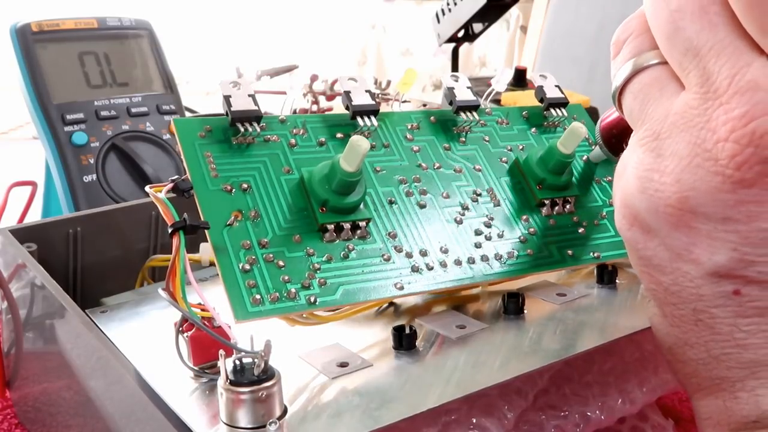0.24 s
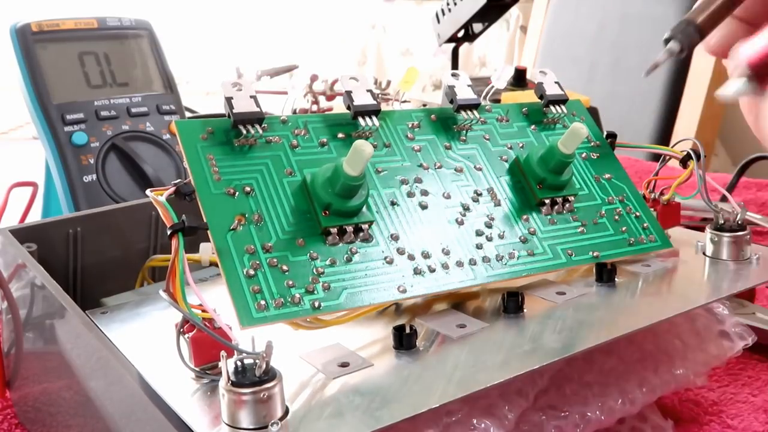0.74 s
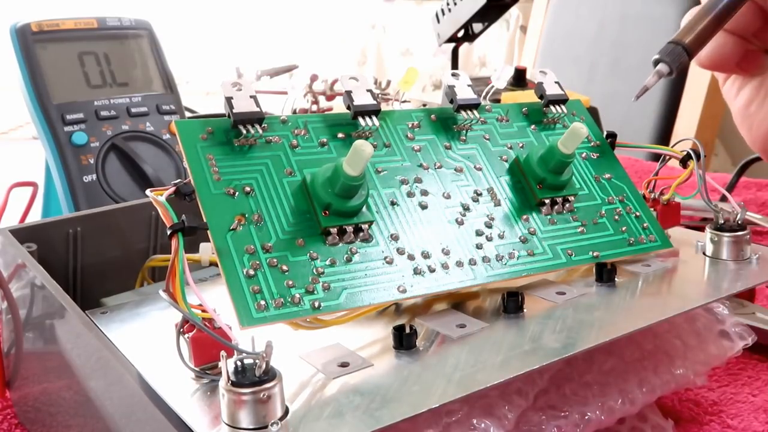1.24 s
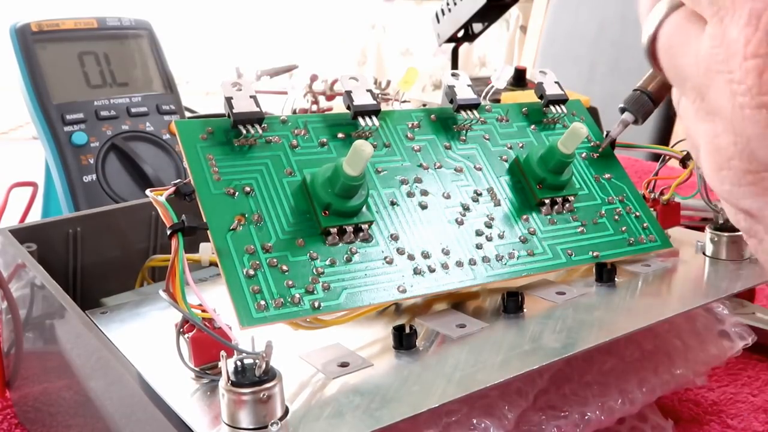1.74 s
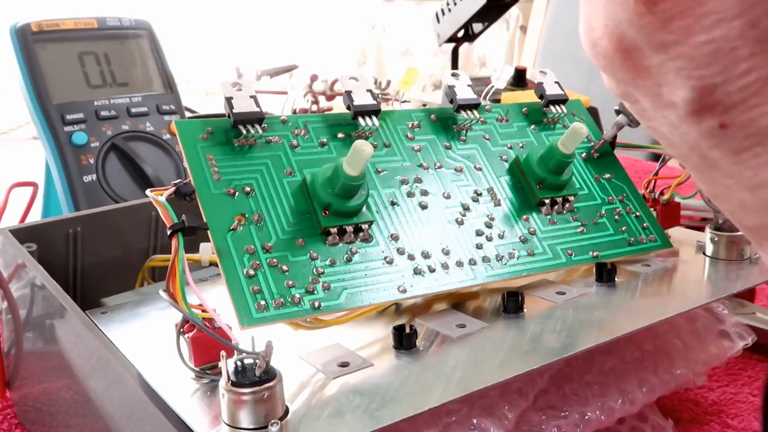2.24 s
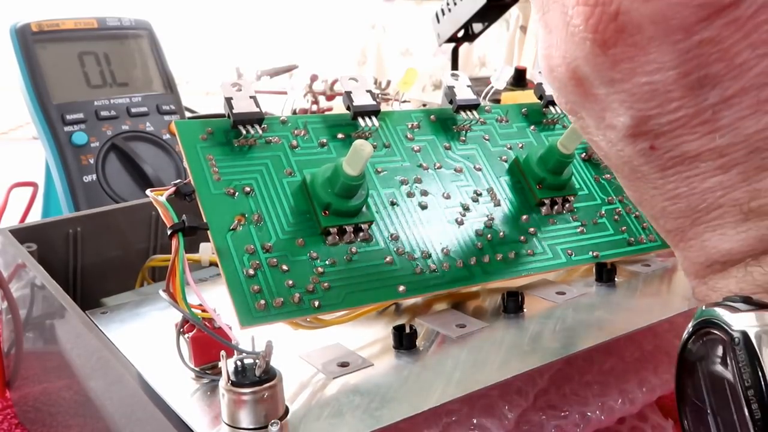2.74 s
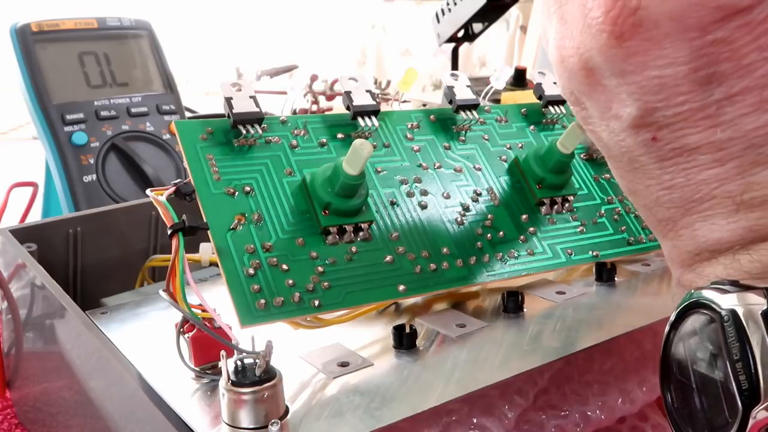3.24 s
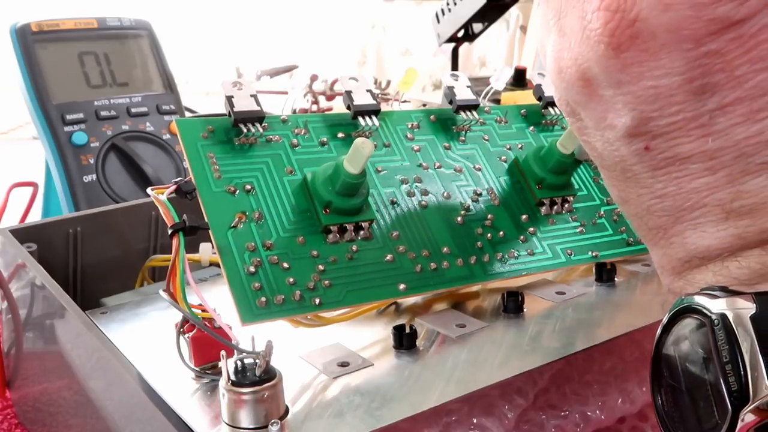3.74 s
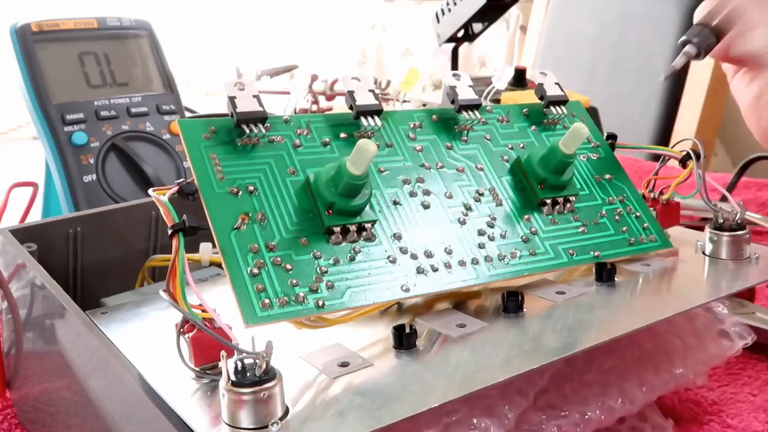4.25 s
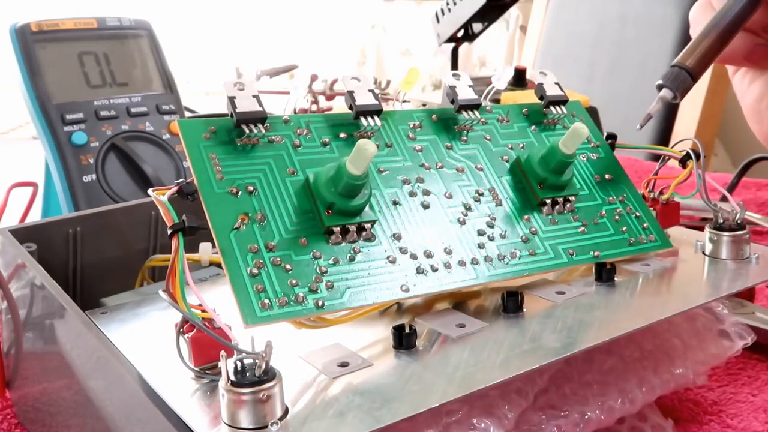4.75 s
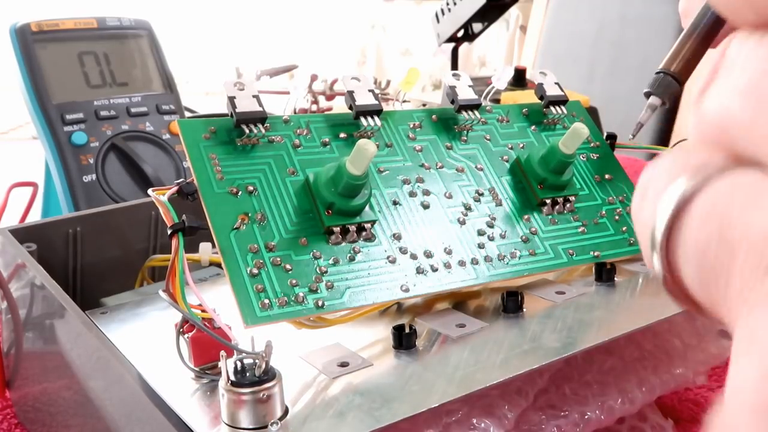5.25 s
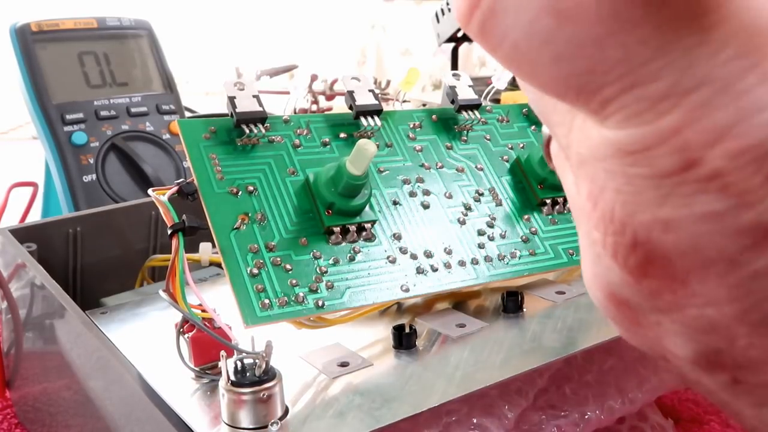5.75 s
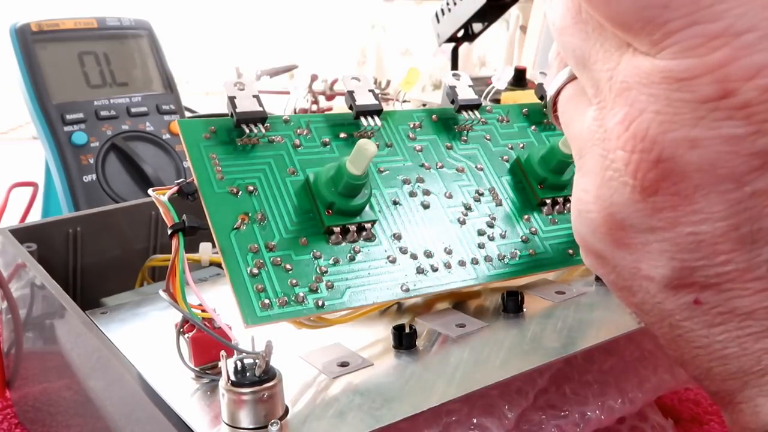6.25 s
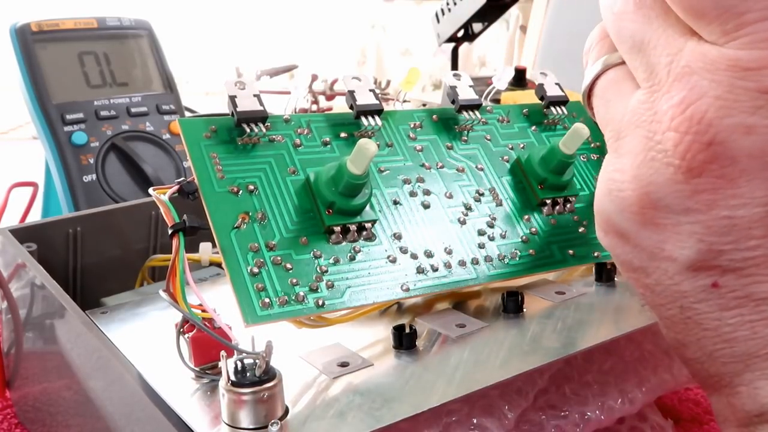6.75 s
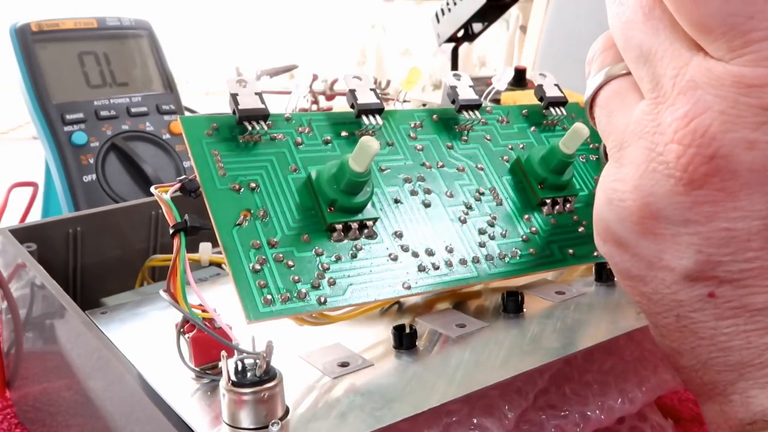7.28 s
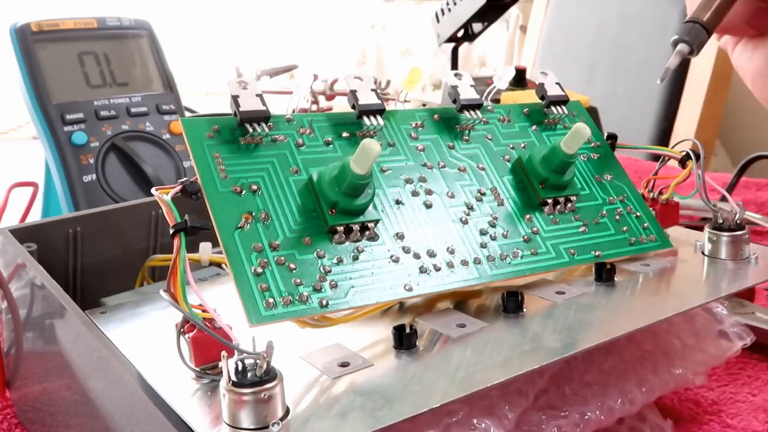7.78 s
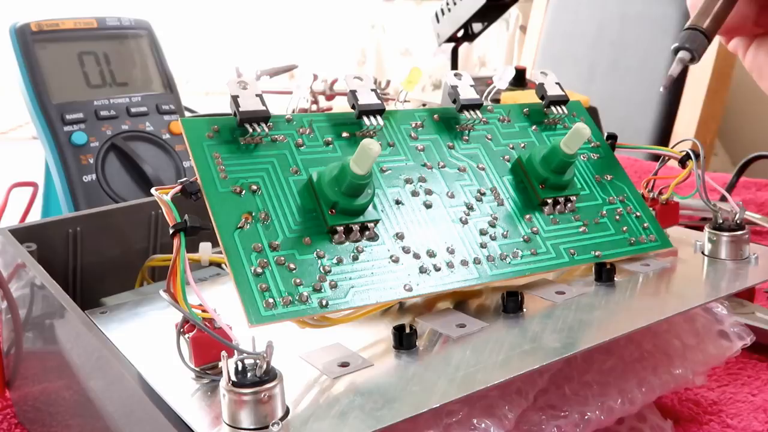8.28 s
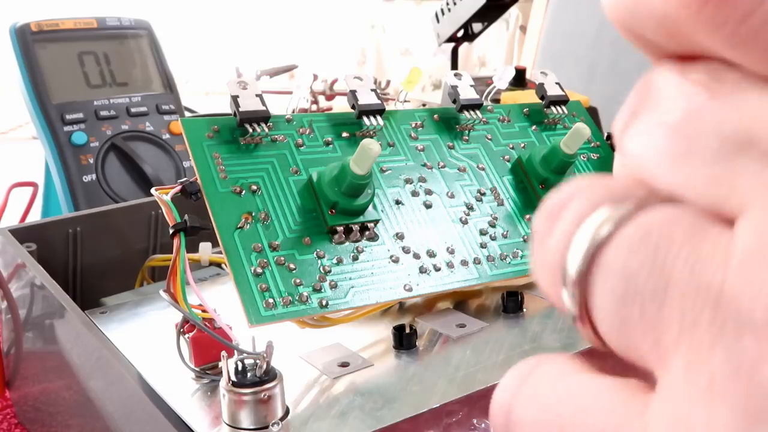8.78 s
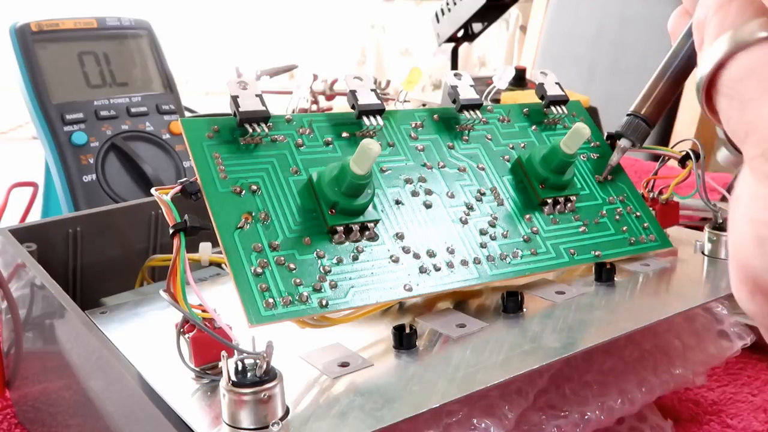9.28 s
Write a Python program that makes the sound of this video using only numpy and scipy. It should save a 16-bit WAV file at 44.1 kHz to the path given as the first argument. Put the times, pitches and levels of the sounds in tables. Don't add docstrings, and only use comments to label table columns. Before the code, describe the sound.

Three pairs of loud snaps in a small, quiet room: a desoldering pump discharges with a tiny rush of air and a bright crack, then is cocked by hand with a short scrape, a metallic catch and a lighter return click. Small ticks, gentle knocks on board and bench and cloth rustle fill the gaps. Close stereo pickup; the low background hiss dips after each snap and recovers.

```python
import sys
import numpy as np
from scipy import signal
from scipy.fft import rfft, irfft, next_fast_len
from scipy.io import wavfile
from scipy.ndimage import uniform_filter1d

SR = 44100
rng = np.random.default_rng(int(sys.argv[2]) if len(sys.argv) > 2 else 0)


def gain_from_decibels(decibels):
    exponent = np.asarray(decibels, float) / 20
    return 10 ** exponent


def wrap_up_sound(samples):
    columns = np.atleast_2d(samples).T
    tamed = np.clip(columns, -1, 1)
    steps = np.round(tamed * 32767).astype(np.int16)
    wavfile.write(sys.argv[1], SR, steps)


N = 419832
T = np.arange(2 ** 14) / SR

# f/Hz, spread/Hz, level/dB, t60/s
BOARD = [(340, 100, -5.5, 0.09), (600, 370, -1.5, 0.24), (1103, 170, -1.5, 0.3), (1380, 250, -3.5, 0.17)]


def evened(x):
    return x / np.sqrt(np.mean(x ** 2) + 1e-20)


def read(points, hz):
    f, value = np.transpose(points)
    return np.interp(np.log(hz + 1), np.log(f + 1), value)


def add(mix, s, sound):
    part = mix[round(s * SR):][:len(sound)]
    part += sound[:len(part)]


def coloured(points, size):
    spectrum = rfft(rng.standard_normal(size))
    spectrum *= gain_from_decibels(read(points, np.fft.rfftfreq(size, 1 / SR)))
    return evened(irfft(spectrum, size))


def fade(t60, rise_s):
    return (1 - np.exp(-T / rise_s)) * gain_from_decibels(-60 * T / t60)


def burst(hold_s, t60, delay_s=0):
    t = T - delay_s
    return np.clip(t * 4000, 0, 1) * gain_from_decibels(-60 * np.maximum(t - hold_s, 0) / t60)


def ring(crowds, factor=1):
    hz, spread_hz, db, t60 = np.transpose(crowds)[:, :, None]
    bins = np.fft.rfftfreq(len(T), 1 / SR)
    off_centre = 2 * (bins - hz * factor) / spread_hz
    shape = 1 / (1 + off_centre ** 2) ** 1.2 / np.sqrt(spread_hz)
    bands = irfft(shape * np.exp(2j * np.pi * rng.random(shape.shape)), len(T))
    decay = gain_from_decibels(db - 60 * T / t60 - 130 * T ** 2)
    sound = (decay * bands).sum(0) * (1 - np.exp(-T / 0.0013))
    return sound / np.sqrt(np.mean(sound[:SR // 50] ** 2))


def thud(hz, t60):
    sinking = 0.6 + 0.31 * np.exp(-T / 0.016)
    push = np.sin(2 * np.pi * hz * T * sinking) * gain_from_decibels(-60 * T / t60)
    return signal.lfilter(*signal.butter(1, 70, "high", fs=SR), push)


def rub(s, length_s, db, shape, colour):
    rise, from_db, slacken, slack_db, last, last_db = shape
    t = np.arange(0, length_s, 1 / SR)
    stroke_db = np.interp(t / length_s, [0, rise, slacken, last], [from_db, 0, slack_db, last_db])
    rough_db = 2.1 * evened(uniform_filter1d(rng.standard_normal(len(t)), 150))
    hiss = coloured(colour, len(t)) * signal.windows.tukey(len(t), 0.15)
    return s, gain_from_decibels(db + stroke_db + rough_db) * hiss


def background():
    # f/Hz, level/dB per Hz
    hiss = [(12, -42), (20, -14.5), (32, -8.5), (66, -9), (220, -7.5), (334, -6.5), (536, -12.5),
            (1110, -15.5), (1380, -17), (2480, -19.5), (9000, -33), (13200, -39.5), (15600, -57)]
    # f/Hz, width/Hz, level/dB
    hum = [(60, 19, -65.5), (87.6, 28, -66.5), (163, 12, -70.5), (331, 24, -69), (13000, 60, -90.5)]
    # f/Hz, likeness/1
    likeness = [(60, 1), (240, 0.35), (950, -0.02), (3770, 0.16), (15000, 0.00017)]
    hiss_db = -54.5
    frames, hz = N // 512 + 5, np.fft.rfftfreq(2048, 1 / SR)
    a, b, c, d, patches = rng.standard_normal((frames, 1025, 5)).T
    patches = evened(uniform_filter1d(uniform_filter1d(patches, 8, 0), 10, 1))
    same = np.clip(read(likeness, hz), -1, 1)[:, None]
    left = a + 1j * b
    right = same * left + np.sqrt(1 - same ** 2) * (c + 1j * d)
    z = np.array([left, right]) * gain_from_decibels(read(hiss, hz)[:, None] + 2.0 * patches)
    out = gain_from_decibels(hiss_db) * evened(signal.istft(z, nperseg=2048, noverlap=1536)[1][:, :N])
    for f, width, db in hum:
        r = np.exp(-np.pi * width / SR)
        wander = rng.standard_normal(N) + 1j * rng.standard_normal(N)
        drift = signal.lfilter([1], [1, -2 * r, r * r], wander)
        out += gain_from_decibels(db) * evened((drift * np.exp(2j * np.pi * f * np.arange(N) / SR)).real)
    return out


def knock(s, db, hz):
    board_db, click_db = 1.1, 0.84
    colour = [(0.2 * hz, -8), (hz, 0), (3 * hz, -14), (8 * hz, -31), (30 * hz, -62)]
    click = coloured(colour, len(T)) * (fade(0.059, 0.0004) + 0.21 * fade(0.24, 0.002))
    note = ring([(hz, 0.27 * hz, 0, 0.065)])
    board = ring(BOARD) * fade(0.19, 0.00082) * min(hz / 800, 1) ** 2
    return s, gain_from_decibels(db) * 0.39 * (note + gain_from_decibels(board_db) * board + gain_from_decibels(click_db) * click)


def ping(s, db, hz, note_db, treble_db):
    return tick(s, db, hz, note_db, treble_db, tail_db=-20.5)


def fire(s, db, thud_db, treble_db):
    # f/Hz, level/dB
    slam_colour = [(150, -26.5), (600, -7.5), (1600, -13.5), (2250, -5.5), (3440, -13), (5110, -2.5),
                   (6100, -12), (7180, -7), (10700, -9), (14000, -3), (15600, -24.5)]
    # f/Hz, level/dB
    rush_colour = [(88, -30), (150, -6), (1640, -11), (2470, -3), (3500, -3), (4960, -1), (8230, -4),
                   (13900, -7), (15600, -16.5)]
    # f/Hz, spread/Hz, level/dB, t60/s
    barrel = [(153.7, 9.5, -6.5, .42), (400, 300, -5.5, 0.24), (580, 390, -6.5, 0.12),
              (813, 90, -13.5, 0.32), (1090, 200, -7.5, 0.14), (2040, 900, -5.5, .2),
              (2670, 2000, -5, 0.23), (3828, 500, -3, .12), (5170, 1500, 0.5, 0.26),
              (7500, 1200, -7.5, 0.22), (11800, 3500, -5, 0.26)]
    travel_s, rush_db, rebound_db = 0.0145, -13.5, -24.5
    chatter = gain_from_decibels(3.1 * evened(uniform_filter1d(rng.standard_normal(len(T)), 40)))
    rush = coloured(rush_colour, len(T)) * chatter * fade(1.0, 0.0046)
    rush *= gain_from_decibels(-60 * np.maximum(T - travel_s, 0) / 0.13)
    crack = [(hz, level + treble_db * np.log2(1 + hz / 8000)) for hz, level in slam_colour]
    hit_and_rattle = burst(0.0025, 0.01) + 0.16 * burst(0.00093, 0.025, 0.008)
    slam = 0.72 * coloured(crack, len(T)) * hit_and_rattle
    slam += gain_from_decibels(thud_db) * thud(350, 0.014) + gain_from_decibels(-21) * thud(180, 0.028)
    slam += gain_from_decibels(-20.0) * ring(barrel)
    sound = gain_from_decibels(rush_db) * (rush + 0.14 * thud(330, 0.062))
    add(sound, travel_s, slam)
    add(sound, travel_s + 0.037, gain_from_decibels(rebound_db) * ring(BOARD) * fade(0.9, 0.0071))
    return s - travel_s, gain_from_decibels(db) * sound


def tick(s, db, hz, note_db=-18, treble_db=-1.5, tail_db=-16):
    colour = [(300, -26), (2200, -5.5), (6000, 1.0), (11000, treble_db - 7.5), (16000, 2 * treble_db - 22)]
    crack = coloured(colour, len(T)) * (burst(0.0012, 0.019) + gain_from_decibels(tail_db) * fade(0.24, 0.0014))
    note = ring([(hz, 0.2 * hz, 0, 0.024)])
    return s, gain_from_decibels(db) * 0.8 * (gain_from_decibels(note_db) * note + crack)


def slide(s, length_s, db):
    # rising share/1, start level/dB, slackening share/1, slack level/dB, last share/1, last level/dB
    stroke = (-1.16, -10, -2.04, -5.5, 1.6, -0.6)
    # f/Hz, level/dB
    colour = [(180, -31), (300, 3), (589, -7), (955, -3), (1470, -10.5), (1970, -7), (6470, -4.5),
              (11900, -10.5), (14500, -23)]
    return rub(s, length_s, db, stroke, colour)


def rustle(s, length_s, db):
    # rising share/1, start level/dB, slackening share/1, slack level/dB, last share/1, last level/dB
    stroke = (-0.75, -7, 0.16, -5, -0.4, -7.5)
    # f/Hz, level/dB
    colour = [(60, -12), (150, -2), (330, 3.5), (700, -7), (1200, -11), (2500, -14), (6000, -35)]
    return rub(s, length_s, db - 5.0, stroke, colour)


def latch(s, db, second_db, spring_hz, jolt_db):
    # f/Hz, level/dB
    click_colour = [(59, -51), (100, -20.5), (1110, -16.5), (1750, -14.5), (2330, -14), (3070, -1.5),
                    (4220, -15.5), (5670, -5.5), (6850, -8.5), (7620, 0.5), (8830, -15), (10500, -10),
                    (15600, -23)]
    # f/Hz, spread/Hz, level/dB, t60/s
    spring = [(3000, 400, 9, 0.21), (3600, 400, -10, .14), (4748, 200, -14, .2), (5700, 900, -12.5, .12),
              (7510, 500, -7, .16), (1100, 1800, -14, .1)]
    click = burst(0.0015, 0.0051) + gain_from_decibels(second_db) * burst(0.0014, 0.02, 0.008)
    click += gain_from_decibels(-26.0) * fade(0.2, 0.002)
    stretch = spring_hz / spring[0][0]
    crack = [(hz * stretch, level) for hz, level in click_colour]
    body = gain_from_decibels(-27.5) * ring(spring, stretch) + gain_from_decibels(jolt_db) * thud(140, 0.07)
    body += gain_from_decibels(-23) * ring([(1.053 * spring_hz, 800, 0, 0.016)])
    return s, gain_from_decibels(db) * (0.61 * coloured(crack, len(T)) * click + body)


def spring_back(s, db, body_db, thud_db):
    # f/Hz, level/dB
    click_colour = [(180, -21.5), (300, -4.5), (1240, -5), (1650, -11), (2750, -5), (3650, -2.5),
                    (6190, -10.5), (7430, -1.5), (12200, -24), (13500, -19.5), (15600, -29)]
    # f/Hz, spread/Hz, level/dB, t60/s
    body = [(130, 79, -5, 0.2), (605, 290, 0, 0.1031), (1190, 490, -6, 0.18), (3590, 1100, 4, 0.118),
            (5220, 310, -9.5, 0.1), (7600, 700, -8.5, 0.08)]
    rod_hz, rod_t60_s, rod_db = 4800, 0.22, -26
    click = 0.7 * coloured(click_colour, len(T)) * (burst(0.0012, 0.0077) + gain_from_decibels(-26.5) * fade(0.22, 0.002))
    rod = np.sin(2 * np.pi * rod_hz * T) * fade(rod_t60_s, 0.0022)
    rings = gain_from_decibels(body_db) * ring(body) + gain_from_decibels(rod_db) * rod
    return s, gain_from_decibels(db) * (click + gain_from_decibels(thud_db) * thud(306, 0.017) + rings)


def room(x):
    # f/Hz, t60/s
    room_t60 = [(150, 0.5), (600, 0.37), (2000, 0.4), (6000, 0.32), (14000, 0.11)]
    taps = np.zeros((2, SR // 2))
    at = np.arange(200, SR // 2 - 20, 20) + rng.integers(0, 20, (2, (SR // 2 - 201) // 20))
    np.put_along_axis(taps, at, rng.choice([-1., 1.], at.shape), 1)
    hz, t, z = signal.stft(taps + 0.23 * taps[::-1], SR, nperseg=256)
    decay = gain_from_decibels(-60 * t / read(room_t60, hz)[:, None])
    tail = signal.istft(z * decay, SR, nperseg=256)[1]
    return signal.fftconvolve(x[None], tail / np.linalg.norm(tail[0]), axes=1)[:, :N]


def ports(x):
    # f/Hz, level/dB
    lean = [(60, -1), (400, 0), (2500, -1), (6000, -1.5), (14000, 1.3)]
    # f/Hz, level/dB
    response = [(20, 1.5), (5500, 0.5), (6500, 0), (10000, 1.5), (12500, 3), (15000, 3)]
    # f/Hz, phase/rad
    port_phase = [(20, -0.35), (600, -0.68), (3000, -0.5), (5000, -1.22), (8000, -1.9), (10000, -2.5),
                  (15000, -2.5)]
    size = next_fast_len(N)
    hz = np.fft.rfftfreq(size, 1 / SR)
    half = np.array([[0.5], [-0.5]])
    scatter = rng.standard_normal((2, 120)) * gain_from_decibels(-60 * T[:120] / 0.0013)
    scatter = rfft(scatter / np.linalg.norm(scatter[0]), size)
    body = 1 + gain_from_decibels(-12) * scatter * hz / (hz + 1500)
    level = gain_from_decibels(half * read(lean, hz) + read(response, hz))
    lag = np.exp(1j * half * read(port_phase, hz))
    return irfft(rfft(x, size) * body * level * lag, size)[:, :N]


def scene():
    # t/s, peak level/dB, thud level/dB, treble level/dB
    fires = [
        (0.7049, -1, -2, -0.5),
        (4.209, 2, -8, -1.5),
        (7.6745, 0.5, -6, 2),
    ]
    # t/s, peak level/dB, second click level/dB, spring f/Hz, hand jolt level/dB
    latches = [
        (1.5936, -1, -13.5, 2887, -43),
        (4.9866, 2, -19, 2995, -29),
        (8.5913, 1.5, -18, 3122, -40.5),
    ]
    # t/s, peak level/dB, body level/dB, thud level/dB
    returns = [
        (1.7113, -14.5, -19.5, -2.5),
        (5.097, -12, -19, -6),
        (8.7132, -4.5, -33, -14.5),
    ]
    # t/s, peak level/dB, main f/Hz
    ticks = [(1.0495, -57, 1997), (1.1875, -33, 3820), (1.3532, -29.5, 5170), (1.433, -45, 4150),
             (3.91, -48, 2366), (4.4486, -40.5, 5170), (4.6767, -50.5, 1780), (4.8243, -46, 5710),
             (5.413, -53.5, 2480), (5.6189, -52.5, 4550), (8.0571, -46.5, 2090), (8.3534, -28.5, 4600),
             (8.4994, -39, 6300), (8.9994, -61.5, 2780)]
    # t/s, peak level/dB, main f/Hz, note level/dB, treble level/dB
    pings = [
        (0.661, -40.5, 2052, -9.5, 0.5),
        (2.036, -45.5, 1990, 0, -3.5),
        (2.036, -48.5, 3730, -3, -6),
        (2.094, -52, 3680, -5.5, -8),
        (4.136, -33, 2370, -13.5, 2.5),
        (7.622, -31, 2720, -6, 3),
    ]
    # t/s, peak level/dB, main f/Hz
    knocks = [(0.371, -38.5, 591), (1.475, -40, 312.6), (2.604, -32.5, 1108), (2.678, -52, 305),
              (2.933, -41, 1080), (3.071, -47.5, 1130), (3.175, -48.5, 1150), (3.207, -47.5, 629),
              (4.618, -31, 336.6), (5.469, -47.5, 155), (5.908, -55.5, 1410), (6.204, -56.5, 1110),
              (6.362, -54.5, 1100), (6.576, -52.5, 1440), (7.128, -50.5, 910), (8.154, -30.5, 232),
              (8.175, -35.5, 331), (8.559, -42, 250), (4.137, -44.5, 600), (9.096, -53, 183),
              (9.349, -53.5, 1121)]
    # start t/s, length t/s, level/dB
    slides = [
        (1.451, .15, -44),
        (4.83, 0.17, -44),
        (8.451, 0.16, -43.5),
    ]
    # start t/s, length t/s, level/dB
    rustles = [
        (1.462, .09, -49.5),
        (3.15, .18, -53),
        (4.63, .36, -51.5),
        (7.101, .13, -54.5),
        (8.18, .26, -49),
        (9.32, .21, -57),
    ]
    bench = np.zeros(N)
    sources = [(fire, fires), (latch, latches), (spring_back, returns), (tick, ticks), (ping, pings),
               (knock, knocks), (slide, slides), (rustle, rustles)]
    for source, table in sources:
        for row in table:
            add(bench, *source(*row))
    return ports(bench + gain_from_decibels(-15) * room(bench)) + background()


def top_cut(x):
    return signal.sosfilt(signal.butter(12, 15780, fs=SR, output="sos"), x)


def record(dry):
    threshold_db, recovery_db_per_s, smoothing_s = -43.0, 46.0, 0.06
    power_db = 10 * np.log10(abs(uniform_filter1d((dry ** 2).mean(0), 300)) + 1e-12)
    fall = np.arange(N) * recovery_db_per_s / SR
    held_db = np.maximum.accumulate(power_db + fall) - fall
    over_db = np.maximum(held_db - threshold_db, 0)
    pole = np.exp(-1 / (smoothing_s * SR))
    duck_db = 0.2 * signal.lfilter([1 - pole], [1, -pole], over_db)
    ducked = np.clip(dry / gain_from_decibels(duck_db), -0.95, 0.95)
    ahead = rng.standard_normal((2, 1800)) * np.hanning(3400)[1600:]
    ahead /= np.linalg.norm(ahead[0])
    smear = signal.fftconvolve(ducked[:, ::-1], ahead, axes=1)[:, :N][:, ::-1]
    return top_cut(ducked + gain_from_decibels(-19.5) * smear)


dry = scene()
out = record(dry)
wrap_up_sound(out)
```